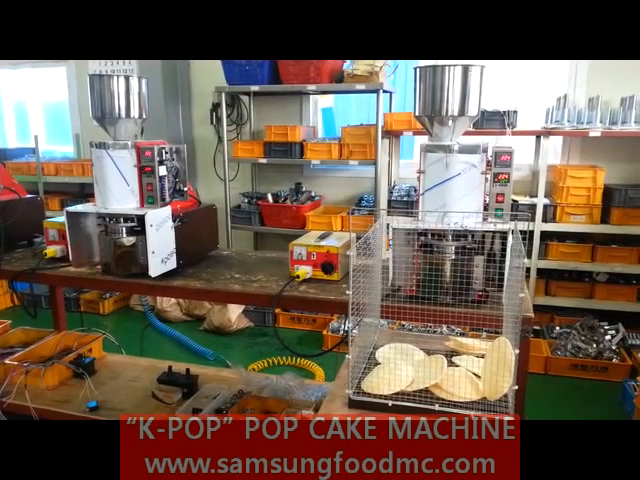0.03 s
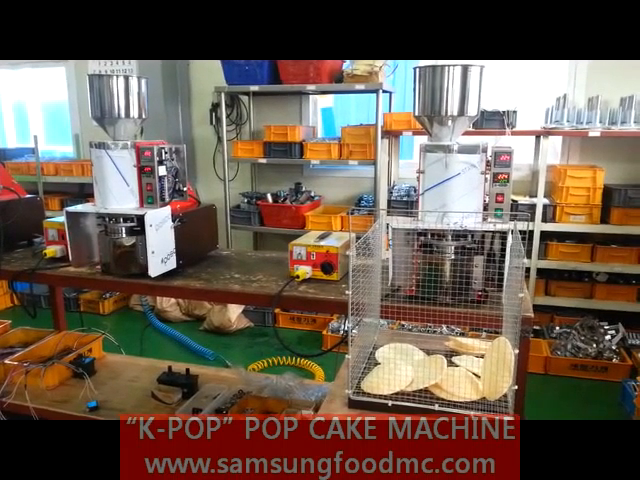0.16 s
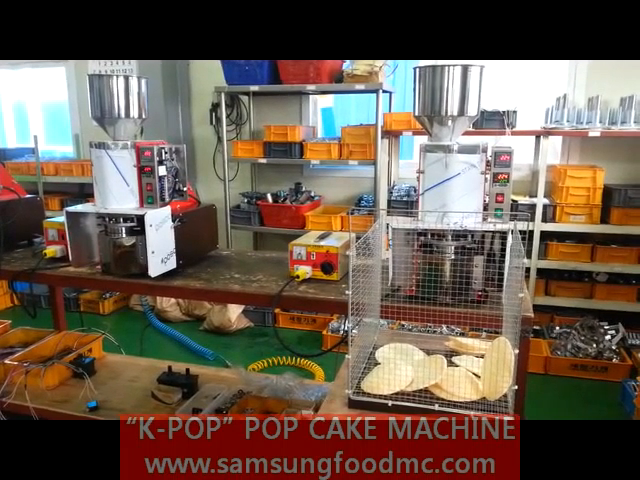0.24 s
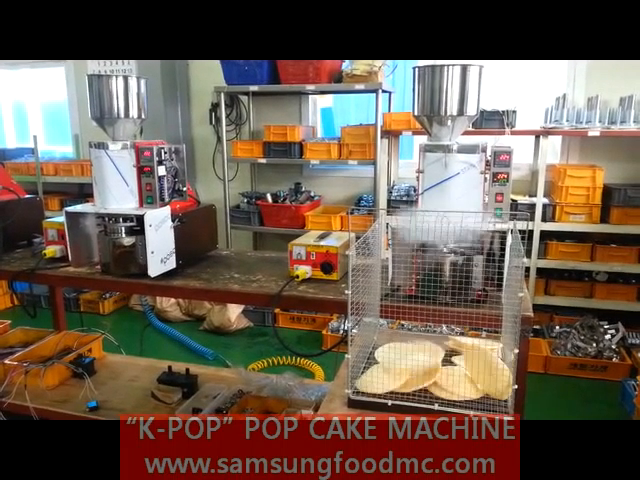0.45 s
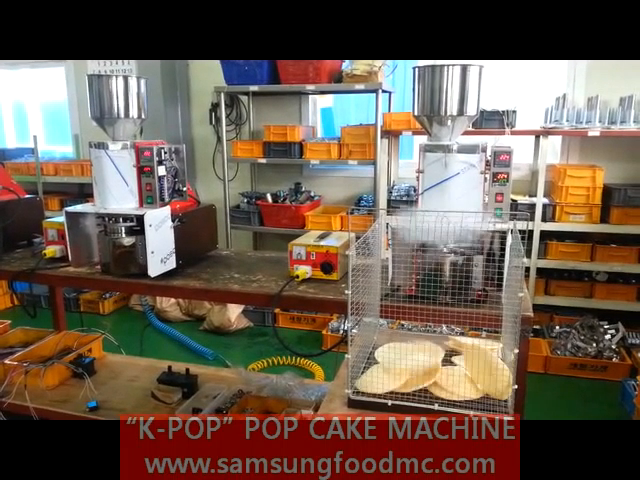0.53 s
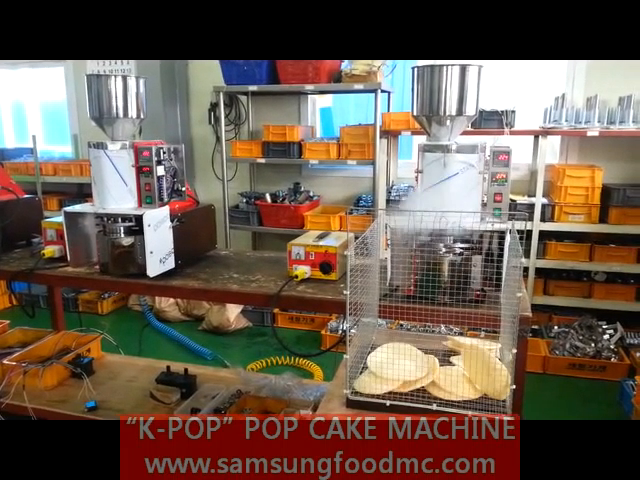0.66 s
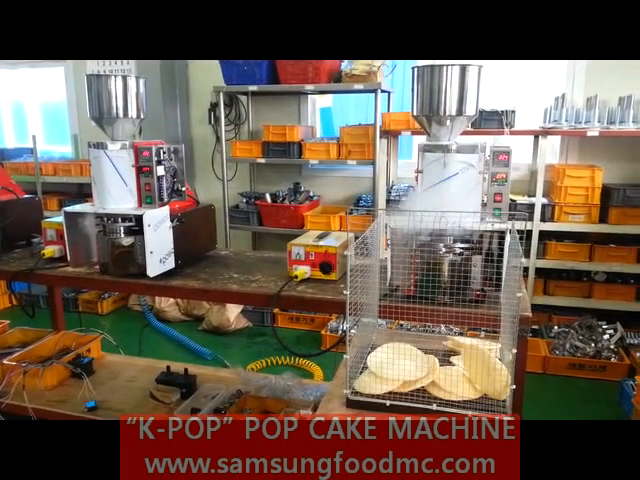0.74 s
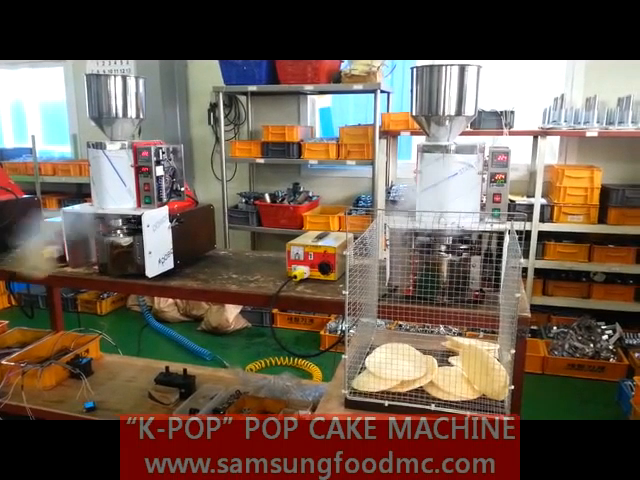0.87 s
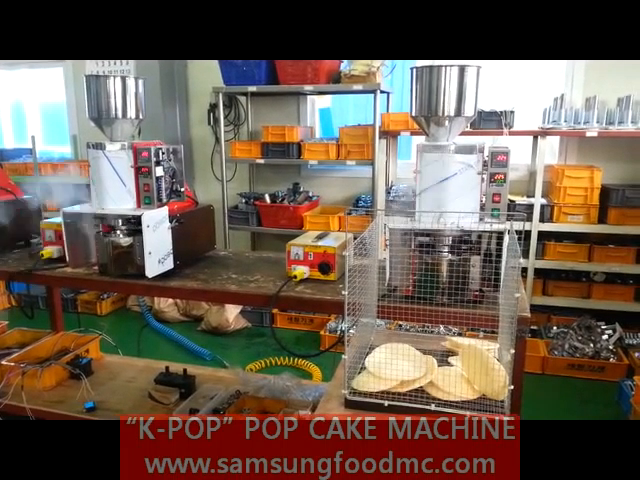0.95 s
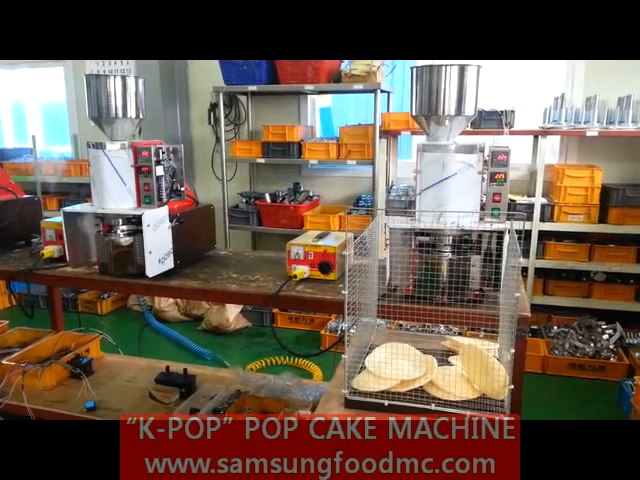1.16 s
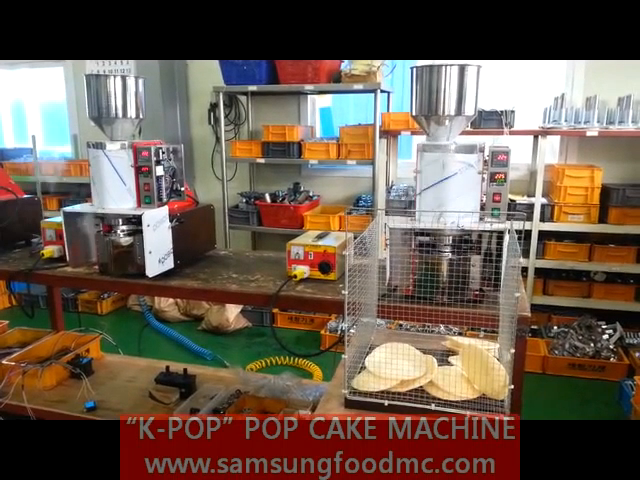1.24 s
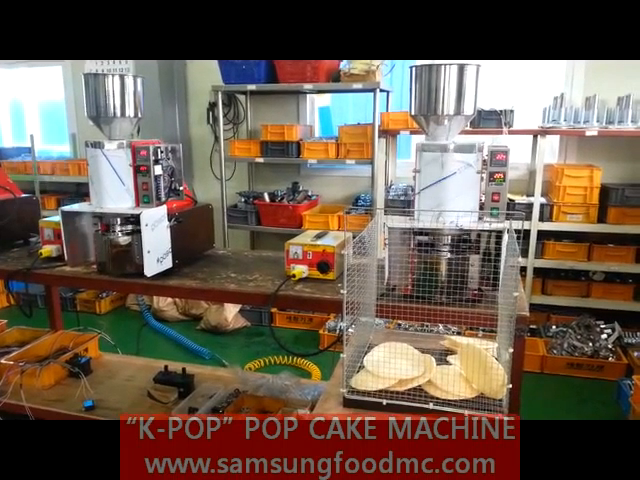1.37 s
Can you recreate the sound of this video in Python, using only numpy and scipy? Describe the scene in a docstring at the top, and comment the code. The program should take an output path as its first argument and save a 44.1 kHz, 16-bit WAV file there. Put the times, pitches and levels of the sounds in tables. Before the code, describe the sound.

Two loud, sharp steam pops burst from rice cake machines. A hiss of air and quick metal clacks lead into the first, and the second follows half a second later. Both overload the microphone and echo through a humming workshop.

```python
"""Two rice cake machines run in a hard-walled workshop, their motors humming throughout.
A faint squeak, a hiss of air, and a mould clacks open. At 0.31 s steam leaks, cracks out and bursts
with a low thud, and the room rings on. After another puff the second machine pops at 0.87 s.
Each burst overloads the recorder, whose gain dips and recovers. A last faint puff sits in the tail."""
import sys
import numpy as np
from scipy import signal
from scipy.fft import rfft, irfft
from scipy.io import wavfile
from scipy.ndimage import uniform_filter1d

SR = 44100
rng = np.random.default_rng(int(sys.argv[2]) if len(sys.argv) > 2 else 0)


def bounce(signal):
    """Save signal as a 16-bit WAV file at the path given by the first command-line argument."""
    frames = np.transpose(np.atleast_2d(signal))
    limited = np.clip(frames, -1, 1)
    pcm = np.round(limited * 32767).astype(np.int16)
    wavfile.write(sys.argv[1], SR, pcm)


N = 61739
T = np.arange(N) / SR
FFT_SIZE = 2 ** 16
HZ = np.maximum(np.arange(FFT_SIZE // 2 + 1) * SR / FFT_SIZE, 1)
OCTAVES = np.log2(HZ / 2000)  # tilts in dB per octave pivot on 2 kHz


# Burst EQ: f/Hz, first machine level/dB, second machine level/dB
BURST_EQ = [(60, -45, -37), (154, -33.5, -29.5), (240, -12, -9), (358, -3.5, -2), (486, -1.5, 0.5),
            (780, 0, -0.5), (1080, -2, -3.5), (1600, -1.5, -2.5), (2900, -4, 0), (3370, -4.5, -3),
            (4680, -1, 0.5), (5480, -10, -7.5), (6960, -9.5, -6), (10260, -14.5, -12.5),
            (13350, -18.5, -20), (15700, -43, -36)]
# Resonances of the room: f/Hz, width/Hz, boost/dB
ROOM_RINGS = [(392.4, 17, 5), (492.4, 12, 7.5), (671, 54, 7.5), (866, 21, 5.5), (980, 14, 1),
              (2353, 60, 3), (2890, 60, 3), (3463, 50, 6), (3970, 37, 4.5), (4365, 35, 5.5),
              (4720, 23, 2.5), (4850, 15, 5), (7270, 30, 7)]
# Pop cues: t/s, blast level/dB, room level/dB, blast hold/s, blast decay/share of the room's,
# leak level/dB, leak lead/s, thump level/dB
POP_CUES = [(0.3144, -2, -8.5, 0.035, 0.24, -12, 0.011, -22.5),
            (0.8725, -2.5, -7.5, .05, 0.26, -12.5, 0.0038, -28.5)]

def steam_pops():
    """Steam leaks, cracks and sizzles through the opening gap, then bursts out and fills the room."""
    rings_db = sum(db * resonance(hz, width) for hz, width, db in ROOM_RINGS)
    crack_eq = 20 * np.log10(resonance(4230, width_hz=940))
    dull_db = -20 * np.log10(1 + (HZ / 7000) ** 8)
    out = 0
    for machine, (start, blast_db, room_db, hold, share, leak_db, lead, _) in enumerate(POP_CUES):
        eq = at_hz(BURST_EQ, HZ, column=machine + 1) + rings_db
        leak = from_db(leak_db) * noise(at_hz(AIR_EQ, HZ))
        leak *= envelope(start - lead, rise=lead, hold=lead, t60=0.065)
        crack = from_db(-8) * noise(crack_eq) * envelope(start, rise=0.0003, hold=0.0046, t60=0.065)
        sizzle = from_db(-11) * noise(eq + 9 * OCTAVES)  # the first bright jet
        sizzle *= envelope(start, rise=0.003, hold=0.008, t60=0.11)
        body = room_wash(eq + 0.5 * OCTAVES, start + 0.0027, rise=0.003, hold=hold, decay_share=share)
        blast = from_db(blast_db) * body
        tail = from_db(room_db) * room_wash(eq, start, rise=0.034, hold=0.065)
        tail += room_modes(machine, start)
        echo = from_db(room_db - 12) * noise(eq + dull_db)  # late swell off the far walls
        echo *= envelope(start + 0.15, rise=0.048, hold=0.048, t60=0.37)
        out = out + leak + crack + sizzle + blast + tail + echo
    return out


def thumps():
    """A short, rough low thud of overload distortion on each burst, wide and leaning left."""
    out = 0
    for start, *_, db in POP_CUES:
        spectrum = rfft(rng.standard_normal((2, FFT_SIZE)))
        rumble = rms_one(irfft(spectrum * resonance(129, width_hz=210))[:, :N])
        out += from_db(db) * rumble * envelope(start, rise=0.001, hold=0.034, t60=0.045)
    return out * from_db([[1], [-1]])


# Reverb time of the workshop: f/Hz, t60/s
ROOM_DECAY = [(100, 1.24), (300, 0.98), (700, 0.79), (2000, 1.12), (4500, 0.99), (7500, 0.66),
              (10000, 0.39), (12000, 0.13), (15000, 0.081)]

def room_wash(eq_db, start, rise, hold, decay_share=1):
    """Diffuse noise: each band dies at its own rate, in a share of the room's reverb time."""
    bands_hz = [125, 300, 700, 2000, 4500, 7500, 10000, 12000, 15000]
    spectrum = rfft(noise(eq_db), FFT_SIZE)
    out = 0
    for hz, solo in zip(bands_hz, np.eye(len(bands_hz))):
        band = irfft(spectrum * np.interp(HZ, bands_hz, solo))[:, :N]
        out += band * envelope(start, rise, hold, decay_share * at_hz(ROOM_DECAY, hz))
    return out


# Low room modes: f/Hz, first machine level/dB, second machine level/dB, t60/s
ROOM_MODES = [(273.7, -35.5, -35, 1.02), (318.2, -42, -30, 1.17), (395.5, -38, -31.5, 0.4),
              (482, -32, -26, 0.32), (522, -35, -46, 1.3), (597.5, -37, -26, .9), (674, -32, -24.5, 1.0),
              (780, -33, -27, 1.2), (842.5, -32.5, -24, 0.83), (981, -38, -40, 0.47),
              (1149, -28, -36, 0.75)]

def room_modes(machine, start):
    """Low modes bloom and linger after a pop, their phase spread between left and right."""
    out = 0
    for hz, *levels_db, t60 in ROOM_MODES:
        tone = from_db(levels_db[machine]) * stereo_sine(hz, spread_rad=0.55)
        out += tone * envelope(start, rise=0.11, hold=0.13, t60=t60)
    return out


# Clack cues: t/s, level/dB, tilt/dB per octave, room level/dB
CLACK_CUES = [(0.2035, -27, 6, -44), (0.2300, -23, -1, -18), (0.2408, -13.5, 2.5, -23.5),
              (0.2642, -17, 0, -29), (0.2947, -15, 9, -42)]
# Clack EQ: f/Hz, level/dB
CLACK_EQ = [(80, -40), (180, -28), (310, -2.5), (550, 0.5), (900, -1), (1800, -4), (3600, -2.5),
            (4700, 0.5), (6000, -7.5), (8000, -12), (11000, -23), (15000, -43)]
# Partials of the struck frame: f/Hz, level/dB, t60/s
FRAME_PARTIALS = [(338, -26, 0.21), (872, -22, 0.34), (1182, -28, 0.31), (1404, -24, .9),
                  (2820, -24.5, 0.25), (4775, -29, .2)]

def mould_drive():
    """Short metal clacks echo in the room and set the frame ringing."""
    out = 0
    for start, db, tilt_db, room_db in CLACK_CUES:
        eq = at_hz(CLACK_EQ, HZ) + tilt_db * OCTAVES
        out += from_db(db) * noise(eq) * envelope(start, rise=0.0008, hold=0, t60=0.032)
        out += from_db(room_db) * room_wash(eq, start, rise=0.0085, hold=0)
    for hz, db, t60 in FRAME_PARTIALS:
        tone = from_db(db) * stereo_sine(hz, spread_rad=0.68)
        out += tone * envelope(start=0.236, rise=0.012, hold=0, t60=t60)
    low_cut = signal.butter(2, 140, "high", fs=SR, output="sos")  # the clacks carry no deep bass
    return signal.sosfilt(low_cut, out)


# Puff cues: t/s, level/dB, hold/s, t60/s
PUFF_CUES = [(0.147, -33.5, 0.074, 0.93), (0.703, -39.5, 0.026, 0.32), (1.272, -53.5, .1, .5)]
# Hiss EQ for valve air and leaking steam: f/Hz, level/dB
AIR_EQ = [(200, -35), (1500, -23), (4000, 4.5), (7000, -2), (10000, -7), (12500, -16), (15000, -34)]

def air_valves():
    """Valves let out bright puffs of air with a soft attack."""
    return sum(from_db(db) * noise(at_hz(AIR_EQ, HZ)) * envelope(start, rise=0.031, hold=hold, t60=t60)
               for start, db, hold, t60 in PUFF_CUES)


def squeak():
    """A faint low tone and its octave slide upward before the first stroke."""
    start, length_s, start_hz, glide_hz_per_s = 0.112, 0.04, 320.6, 6000
    age = np.clip(T - start, 0, length_s)
    phase = 2 * np.pi * (start_hz + glide_hz_per_s * age / 2) * age
    fade = np.sin(np.pi * age / length_s)
    return from_db(-39) * fade * (np.sin(phase) + 0.5 * np.sin(2 * phase))


# Motor whirr EQ: f/Hz, level/dB
WHIRR_EQ = [(40, -52), (120, -50), (220, -27.5), (350, -11), (600, -5), (850, -4), (1100, -5.5), (1500, 0),
            (2200, 0.5), (3000, -8), (4200, -10), (5800, -16.5), (7500, -20.5), (10000, -32), (15000, -62)]
# Level of the whirr over time: t/s, level/dB
WHIRR_LEVEL = [(0, -26), (.08, -24.5), (.2, -26.5), (.6, -30.5), (.8, -28.5), (1.15, -28), (1.4, -29.5)]
# Gear tones: f/Hz, level/dB
GEAR_TONES = [(630, -44), (885, -42), (1303, -44.5), (1421, -39.5), (1663, -42), (1868, -41.5), (2038, -50),
              (2083, -46), (2191, -65), (2310, -45), (2842, -62), (3935, -51)]

def motors():
    """The bed: a fluttering motor whirr under gear tones that waver in pitch and level."""
    whirr_db = np.interp(T, *np.transpose(WHIRR_LEVEL)) + 0.66 * drift(rate_hz=51)
    out = from_db(whirr_db) * noise(at_hz(WHIRR_EQ, HZ))
    for hz, db in GEAR_TONES:
        pitch_hz = hz + 6.97 * drift(rate_hz=13.7)
        phase = 2 * np.pi * np.cumsum(pitch_hz) / SR + rng.normal(0, 1.0, (2, 1))
        out += from_db(db + 3 * drift(rate_hz=6.9)) * np.sin(phase)
    return out


# Stereo width (fairly narrow lows, wide mids, near-mono treble): f/Hz, left-right correlation
STEREO_WIDTH = [(60, .6), (350, 0.76), (750, 0.65), (1200, 0.11), (2400, .25), (5200, 0.073), (6500, 1),
                (9000, 0.9), (14000, 0.52)]

def noise(eq_db):
    """Stereo noise at rms 1 whose width varies with frequency; the EQ sets only its colour."""
    mid, side = rng.standard_normal((2, len(HZ))) + 1j * rng.standard_normal((2, len(HZ)))
    alike = np.clip(at_hz(STEREO_WIDTH, HZ), -0.99, 0.99)
    spectrum = np.sqrt(1 + alike) * mid + np.sqrt(1 - alike) * side * [[1], [-1]]
    return rms_one(irfft(from_db(eq_db) * spectrum)[:, :N])


def stereo_sine(hz, spread_rad):
    """A sine widened by a random phase offset in each channel."""
    phase = rng.uniform(0, 2 * np.pi) + rng.normal(0, spread_rad, (2, 1))
    return np.sin(2 * np.pi * hz * T + phase)


def drift(rate_hz):
    """Smooth random modulation at rms 1."""
    spectrum = rfft(rng.standard_normal(FFT_SIZE))
    return rms_one(irfft(spectrum / (1 + (HZ / rate_hz) ** 2))[:N])


def envelope(start, rise, hold, t60):
    """Linear attack, exponential release; times in seconds, the hold counted from the start."""
    age = T - start
    return np.clip(age / rise, 0, 1) * np.exp(-np.log(1000) * np.maximum(age - hold, 0) / t60)


def resonance(hz, width_hz):
    """Power response of a resonance, 1 at the peak."""
    return 1 / (1 + (2 * (HZ - hz) / width_hz) ** 2)


def at_hz(points, hz, column=1):
    """Read a table column on a log-frequency axis."""
    table = np.array(points)
    return np.interp(np.log(hz), np.log(table[:, 0]), table[:, column])


def from_db(db):
    """Decibels to gain."""
    return 10 ** (np.asarray(db) / 20)


def rms_one(x):
    """Scale to rms 1."""
    return x / np.sqrt(np.mean(x ** 2) + 1e-20)


def scene():
    """The mix: pops up front, mechanics around them, motors underneath."""
    return steam_pops() + thumps() + mould_drive() + air_valves() + motors() + squeak()


def record(dry):
    """The gain ducks under loud sound and recovers; peaks clip; the top end is cut."""
    threshold_db, squeeze, attack_s, release_db_per_s = -8.5, 0.48, 0.017, 68
    power = uniform_filter1d(np.mean(dry ** 2, axis=0), size=256)
    over_db = np.maximum(10 * np.log10(np.maximum(power, 1e-12)) - threshold_db, 0)
    release_db = release_db_per_s * T
    held_db = np.maximum.accumulate(over_db + release_db) - release_db
    pole = np.exp(-1 / (attack_s * SR))
    duck_db = squeeze * signal.lfilter([1 - pole], [1, -pole], held_db)
    clipped = np.clip(dry * from_db(-duck_db), -1, 1)
    high_cut = signal.ellip(10, 0.1, 70, 15550, fs=SR, output="sos")
    return signal.sosfilt(high_cut, clipped)


dry = scene()
out = record(dry)
bounce(out)
```